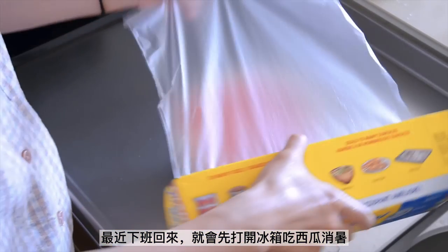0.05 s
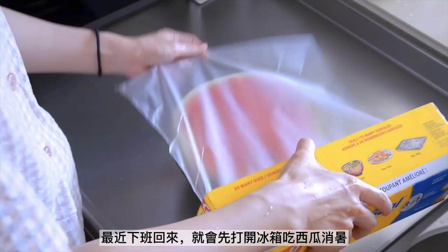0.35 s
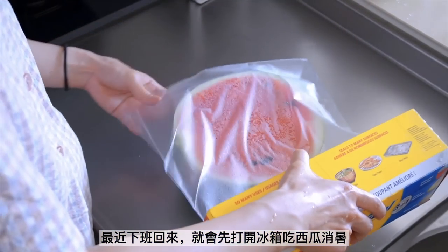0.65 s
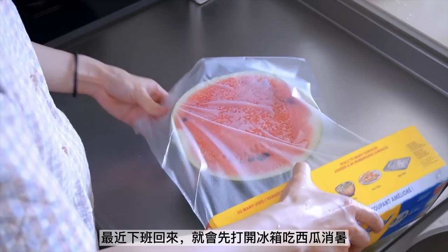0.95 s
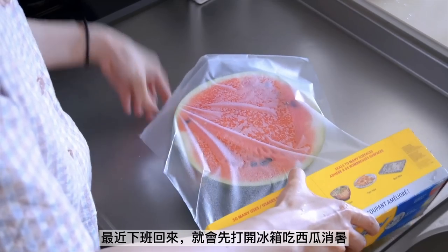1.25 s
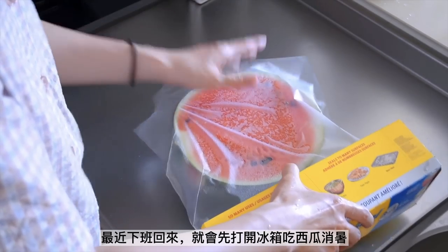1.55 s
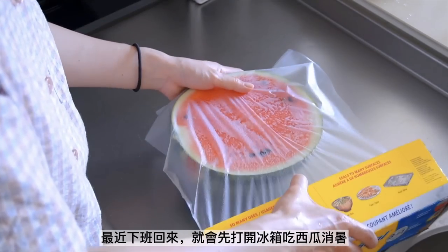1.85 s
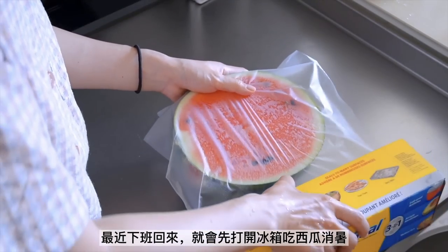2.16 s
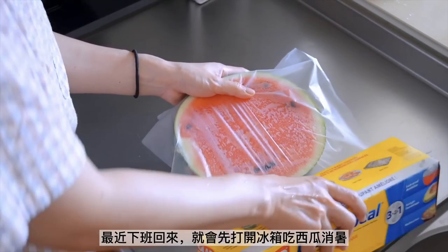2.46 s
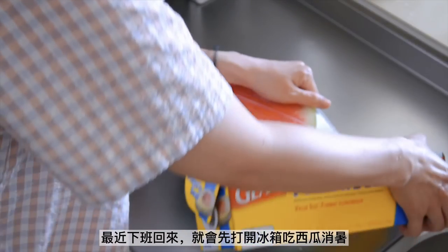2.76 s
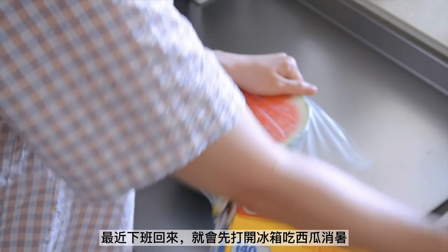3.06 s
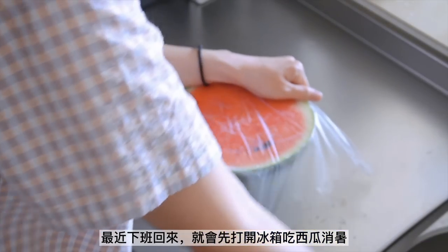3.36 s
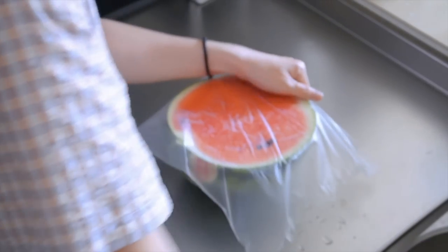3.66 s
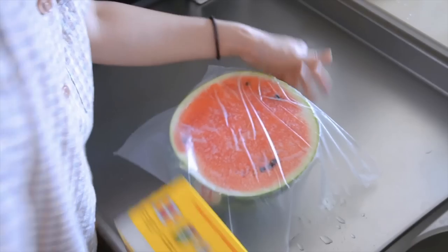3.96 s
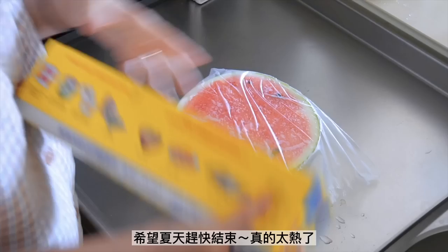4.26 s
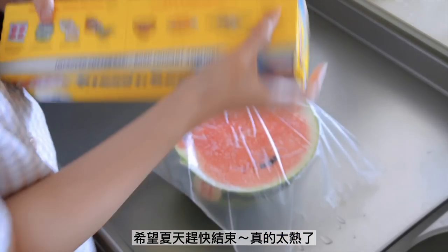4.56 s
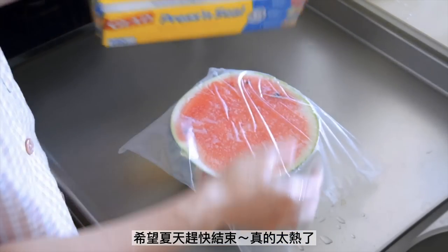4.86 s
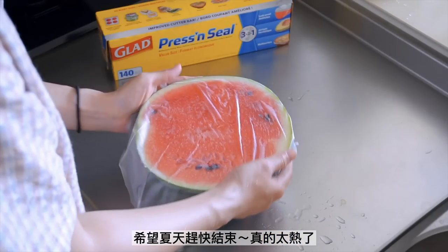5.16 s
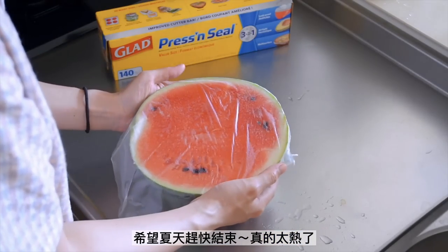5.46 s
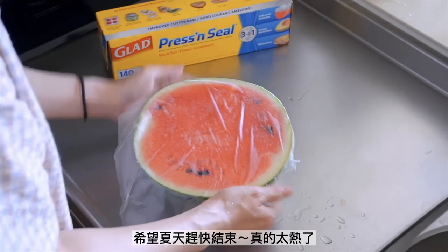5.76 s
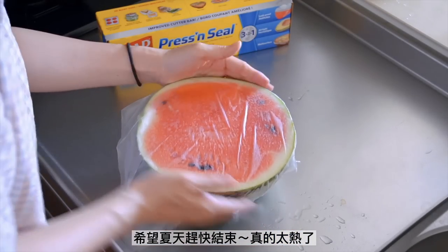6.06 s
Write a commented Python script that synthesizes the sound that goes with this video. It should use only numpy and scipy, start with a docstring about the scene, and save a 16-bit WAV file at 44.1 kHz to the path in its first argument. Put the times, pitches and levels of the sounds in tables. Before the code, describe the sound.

Plastic wrap is pulled from its cardboard box with a short rasp right at the start. It rustles softly as it is draped over half a melon until about 1.5 seconds, then crinkles as it is stretched, while the roll knocks hollowly in the box several times between 1.8 and 2.8 seconds. From 2.8 to 3.5 seconds the film tears along the toothed edge in loud, coarse bursts with sharp snaps, ending with a dull knock. A lighter rustle follows near 3.7 seconds, and the box is set down with soft scuffs around 4.5 seconds. At 5 seconds a palm pats the melon, and the wrap is pressed around it with crisp crackles, snaps and faint squeaks, easing briefly before a last burst just after 6 seconds. Everything is close and straight ahead, with a small kitchen's short echo and quiet, steady room noise.

```python
"""Plastic wrap is pulled from its cardboard box and draped over half a melon on a steel kitchen counter.
The film crinkles as swarms of tiny creases buckle; now and then a large one snaps or the film squeaks.
It is stretched, the roll knocking in the box, and at 2.8 s torn off on the toothed edge; box and taut
sheet add a hollow body. The film is let go and the box set down. At 5 s a palm pats the melon and the
wrap is pressed down round it. The small room echoes over quiet, steady noise."""
import sys
import numpy as np
from scipy import signal
from scipy.fft import rfft, irfft
from scipy.io import wavfile
from scipy.ndimage import uniform_filter1d

SR = 44100
rng = np.random.default_rng(int(sys.argv[2]) if len(sys.argv) > 2 else 0)


def put_to_file(sound):
    """Save the sound as 16-bit audio at rate SR, in the file named by the first command-line argument."""
    columns = np.atleast_2d(sound).T  # one column per channel
    safe = np.clip(columns, -1, 1)
    whole_steps = np.round(safe * 32767)
    wavfile.write(sys.argv[1], SR, whole_steps.astype(np.int16))


N = 274302
TAPS = 2048
BINS_HZ = np.fft.rfftfreq(TAPS, 1 / SR)


# Hand strokes, one table per action. Each row: start in seconds, rise in seconds, hold in seconds,
# fade in dB/s, crinkle level in dB, top treble over the crinkle in dB, hollow body level in dB.
UNROLL_STROKES = [(0.0, 0.001, .022, 230, -31.5, -7, -38.5), (0.05, 0.0092, 0.068, 150, -40, -7.5, -44.5),
                  (0.27, .01, .05, 40, -61.5, -1.5, -69)]
DRAPE_STROKES = [(0.345, .05, .1, 11, -53.5, -4, -66), (0.43, 0.068, .025, 230, -49.5, -1, -62),
                 (0.65, 0.061, 0.023, 50, -42, -1, -52.5), (0.92, .012, 0.0082, 90, -55, 2, -56.5),
                 (1.075, 0.016, .08, 20, -53, -2, -61), (1.31, .06, 0.1, 270, -54, -1.5, -75)]
STRETCH_STROKES = [(1.531, .005, .05, 40, -52.5, 0, -61.5), (1.58, 0.094, .1, 50, -47.5, 1.5, -56.5),
                   (1.71, 0.048, 0.022, 85, -46, -7, -43), (1.825, 0.011, .04, 100, -48.5, -4, -43),
                   (1.94, 0.018, 0.014, 190, -47, -4, -43), (2.1, 0.02, 0.072, 210, -56.5, -4, -51),
                   (2.245, 0.0036, 0.13, 110, -52.5, -2.5, -50), (2.475, 0.0064, .01, 75, -55, 0.5, -57),
                   (2.612, .015, .02, 65, -49, 0.5, -55.5), (2.73, .04, .02, 120, -50.5, 2, -56.5)]
TEAR_STROKES = [(2.812, 0.0084, .012, 300, -30.5, 3.5, -34), (2.85, 0.014, 0.021, 159, -30.5, 3, -32.5),
                (2.955, .004, .029, 260, -26.5, 2, -32), (3.0, .012, 0.024, 170, -32.5, 4, -34),
                (3.06, 0.0079, .012, 380, -34, 1.5, -42), (3.15, .038, .002, 300, -30.5, 1, -39.5),
                (3.21, 0.0087, 0.009, 230, -39, 2, -41.5), (3.28, 0.0092, 0.064, 100, -47, 3.5, -51.5),
                (3.351, .016, .028, 330, -26.5, 4.5, -35), (3.425, 0.011, 0.0092, 154, -36, 2, -37)]
LET_GO_STROKES = [(3.635, .035, .06, 150, -58.5, 4, -74), (3.72, .03, 0.092, 130, -45, 2, -61),
                  (3.78, 0.024, 0.071, 170, -45.5, 3.3, -60)]
PRESS_STROKES = [(4.986, 0.013, 0.011, 75, -29, -0.5, -45.5), (5.11, 0.019, 0.055, 48, -32.5, -1, -50),
                 (5.28, 0.011, 0.062, 65, -37.5, -3, -51), (5.43, 0.0086, 0.12, 190, -41, -3.5, -51),
                 (5.595, 0.028, 0.04, 80, -40.5, -0.5, -50.5), (5.66, 0.061, 0.025, 144, -38.5, 2, -49.5),
                 (5.79, 0.027, 0.15, 60, -55, -21, -50.5), (5.975, .005, .02, 169, -37.5, 1, -45.5),
                 (6.068, 0.0046, .022, 170, -30, 0, -44), (6.125, 0.047, 0.037, 100, -33.5, 0.5, -46)]
# Film spectra, one table per state. Each row: frequency in Hz, level in dB.
ROLL_SPECTRUM = [(35, -93), (60, -49), (338, -17.5), (636, -7.5), (749, -19), (822, -7), (968, -9),
                 (1090, -1), (1200, -6.5), (4120, -8.5), (16000, -20)]
SLACK_SPECTRUM = [(35, -83), (60, -56), (193, -34), (274, -26), (579, -12), (666, -15), (785, -3),
                  (1440, -8.5), (4420, -3.5), (14200, -8), (16000, -10)]
TAUT_SPECTRUM = [(35, -88), (60, -75), (222, -20.5), (274, -21), (749, -1.5), (924, -9.5), (1040, -2.5),
                 (1170, -6), (4750, -2.5), (14900, -7), (16000, -16)]
TEAR_SPECTRUM = [(35, -68), (60, -48), (294, -13), (417, -8.5), (566, -3), (666, -6), (749, -2.5),
                 (1200, -2.5), (1310, 1), (1510, -4.5), (4030, 3), (11800, -3.5), (16000, -6.5)]
PRESS_SPECTRUM = [(35, -72), (60, -40.5), (156, -39.5), (189, -17.5), (268, -34.5), (294, -21),
                  (527, -14.5), (1380, -7.5), (2190, -7), (3190, 0), (11300, -3), (14900, -1.5),
                  (16000, -20.5)]
# Cardboard box resonances. Each row: centre in Hz, width in Hz, lift in dB.
BOX_MODES = [(203, 32, 3.5), (257, 24, 2), (570, 17, 6.5), (778, 55, 7), (1020, 106, 5.5), (1400, 40, 5.5),
             (2090, 80, -0.5), (2350, 130, 1.5), (3270, 770, 3), (4280, 630, 1.5)]

def plastic_wrap():
    """The film through six actions: draping is a fine rustle, tearing is coarse and shakes the box."""
    out = np.zeros(N)
    add(out, *film(UNROLL_STROKES, ROLL_SPECTRUM, creases_per_s=4000, spread_db=2.5, clump_db=3,
                   box_share=0.58, crinkle_db=0.5, sparkle_db=-3, body_db=-0.5))
    add(out, *film(DRAPE_STROKES, SLACK_SPECTRUM, creases_per_s=7000, spread_db=2.5, clump_db=3.5,
                   box_share=0.31, crinkle_db=-0.5, sparkle_db=-1.5, body_db=-2.5))
    add(out, *film(STRETCH_STROKES, TAUT_SPECTRUM, creases_per_s=6000, spread_db=0, clump_db=2.7,
                   box_share=0.56, crinkle_db=2.5, sparkle_db=-1, body_db=-0.5))
    add(out, *film(TEAR_STROKES, TEAR_SPECTRUM, creases_per_s=3300, spread_db=2, clump_db=2.5,
                   box_share=0.98, crinkle_db=0.5, sparkle_db=-7, body_db=-2))
    add(out, *film(LET_GO_STROKES, SLACK_SPECTRUM, creases_per_s=2900, spread_db=0, clump_db=-1.5,
                   box_share=0.28, crinkle_db=-2.5, sparkle_db=-8, body_db=-0.5))
    add(out, *film(PRESS_STROKES, PRESS_SPECTRUM, creases_per_s=5000, spread_db=1.5, clump_db=-0.5,
                   box_share=0.46, crinkle_db=0, sparkle_db=-2.5, body_db=1))
    return out


def film(strokes, spectrum, creases_per_s, spread_db, clump_db, box_share,
         crinkle_db, sparkle_db, body_db):
    """One action: crinkle and sparkle over the hollow body of sheet and box. Returns start and sound."""
    start_s, rise_s, hold_s, fade_db_per_s, level_db, crisp_db, hollow_db = strokes_by_column(strokes)
    end_s = np.max(start_s + rise_s + hold_s + 45 / fade_db_per_s)  # 45 dB into the fade
    t = np.arange(start_s.min(), min(end_s, N / SR), 1 / SR)
    pull_db = hand_effort(t - start_s, rise_s, hold_s, fade_db_per_s)
    spectrum_db = curve(spectrum, BINS_HZ) + box_share * resonance_db(BOX_MODES)
    creases = buckling(len(t), spectrum_db, creases_per_s, spread_db, clump_db)
    creases *= signal.windows.tukey(len(t), 160 / len(t))
    # The heavy body lingers; the finest creases stop first.
    body_curve_db = power_sum_db(0.91 * pull_db + hollow_db) + body_db
    crinkle_curve_db = power_sum_db(pull_db + level_db) + crinkle_db
    sparkle_curve_db = power_sum_db(1.11 * pull_db + level_db + crisp_db) + sparkle_db
    body = shaped_band(creases, body_curve_db, edges_hz=[45, 1650], core_hz=[300, 1600])
    crinkle = shaped_band(creases, crinkle_curve_db, edges_hz=[2000, 7200], core_hz=[2500, 6500])
    sparkle = shaped_band(creases, sparkle_curve_db, edges_hz=[7200, 20000], core_hz=[8000, 16000])
    return t[0], body + crinkle + sparkle


def hand_effort(age_s, rise_s, hold_s, fade_db_per_s, swell_db=14, sag_db_per_s=12.5):
    """A stroke in dB: the hand gathers speed, the creases give way under its pull, the film settles."""
    onset_db = swell_db * (1 - np.clip(age_s / rise_s, 0, 1)) ** 2
    sag_db = sag_db_per_s * np.clip(age_s - rise_s, 0, hold_s)
    settle_db = fade_db_per_s * np.maximum(age_s - rise_s - hold_s, 0)
    return np.where(age_s < 0, -200, -onset_db - sag_db - settle_db)


def buckling(size, spectrum_db, creases_per_s, spread_db, clump_db, facet_db=4, turn_db=1.5, facets=20):
    """Creases buckle at random, mostly small; each facet of the sheet rings its own way, in turns."""
    neighbours_db = clump_db * drift(size, 170)  # one crease sets off the next
    out, power = np.zeros(size), np.zeros(size)
    for _ in range(facets):
        modes = [(1500 * 9 ** u, 350 + 1100 * u, facet_db * (0.5 + v)) for u, v in rng.random((3, 2))]
        crease_db = spread_db * np.minimum(rng.exponential(1, size), 4)
        crease_db += neighbours_db + turn_db * drift(size, 14.3)
        buckles = rng.random(size) < creases_per_s / facets / SR
        clicks = gain_of(crease_db) * buckles * rng.choice([-1, 1], size)
        out += signal.oaconvolve(clicks, ring(spectrum_db + resonance_db(modes)))[:size]
        power += clicks ** 2
    local_power = uniform_filter1d(uniform_filter1d(power, size=700), size=500)
    return out / np.sqrt(abs(local_power) + 0.02 * power.mean())  # the hand feeds in energy steadily


# Large creases. Each row: start in seconds, level in dB, resonance in Hz.
CREASE_SNAPS = [(0.058, -22.5, 4090), (0.121, -29, 3240), (0.1446, -29, 2720), (0.82, -25.5, 7990),
                (1.534, -34, 8790), (2.827, -15, 3680), (3.033, -14.5, 3750), (3.2835, -30, 3030),
                (3.3535, -16, 5300), (3.3907, -14.5, 3150), (5.136, -19, 4900), (5.2923, -14.5, 5100),
                (5.3778, -15, 3260), (5.4389, -14.5, 3180), (5.511, -19.5, 5070), (5.538, -19.5, 5300),
                (5.618, -25, 8250), (6.1557, -17, 3740)]

def crease_snaps(gain_db=1, width_hz=2300, lift_db=10):
    """A large crease flips: a short click that stirs the film around it."""
    out = np.zeros(N)
    for start_s, level_db, hz in CREASE_SNAPS:
        sheet = ring(curve(PRESS_SPECTRUM, BINS_HZ) + resonance_db([(hz, width_hz, lift_db)]))
        click = signal.fftconvolve(impact(chatter=0.067, decay_s=0.0028), sheet)
        add(out, start_s, at_peak(click, level_db + gain_db))
    return out


# Film sliding on fingers and rind. Each row: start in seconds, length in seconds, level in dB,
# first pitch in Hz, last pitch in Hz, jitter as a fraction of pitch.
FILM_SQUEAKS = [(1.188, 0.028, -46, 1230, 1203, 0.07), (1.238, 0.0164, -52.5, 1230, 1200, 0.08),
                (2.748, 0.053, -47.5, 4000, 4100, 0.16), (3.743, 0.016, -45.5, 2150, 2150, 0.12),
                (5.657, 0.047, -44, 5400, 5400, 0), (5.673, 0.14, -41.5, 2970, 2256, 0.25),
                (6.072, .032, -34, 3600, 3600, 0.05)]

def film_squeaks(db_per_harmonic=-4, flutter_db=6.4):
    """Stick and slip: an uneven, nearly pitched chatter with weak overtones."""
    out = np.zeros(N)
    for start_s, length_s, level_db, first_hz, last_hz, jitter in FILM_SQUEAKS:
        size = round(length_s * SR)
        pitch_hz = np.linspace(first_hz, last_hz, size) * (1 + jitter * drift(size, 1200))
        phase = 2 * np.pi * np.cumsum(pitch_hz) / SR
        tone = sum(gain_of(db_per_harmonic * k) * np.cos((k + 1) * phase) for k in range(3))
        slips = filtered(tone * gain_of(flutter_db * drift(size, 720)), [700, 6000], "band")
        add(out, start_s, gain_of(level_db) * unit_rms(slips) * signal.windows.tukey(size, 0.5))
    return out


# Knocks of the roll. Each row: start in seconds, level in dB, treble tilt in dB/octave.
ROLL_KNOCKS = [(0.927, -33.5, 1), (1.83, -28, -4), (1.863, -26.5, 3), (2.111, -36, -3), (2.168, -33, 2.5),
               (2.246, -44, 5), (2.262, -38, -11), (2.348, -26.5, 0), (2.48, -28.5, 5.5),
               (2.613, -22.5, 0.5), (2.814, -21.5, 5.5), (3.486, -25.5, -9.5)]
# Struck cardboard. Each row: frequency in Hz, level in dB.
KNOCK_SPECTRUM = [(100, -47.5), (400, -12.5), (750, 2.5), (1700, -0.5), (3500, -2.5), (7000, -3.5),
                  (16000, -14.5)]

def roll_knocks(gain_db=1):
    """The roll knocks in its box and rings the cardboard."""
    out = np.zeros(N)
    for start_s, level_db, tilt_db_per_octave in ROLL_KNOCKS:
        treble_db = tilt_db_per_octave * np.log2(1 + BINS_HZ / 3000)
        cardboard = ring(curve(KNOCK_SPECTRUM, BINS_HZ) + resonance_db(BOX_MODES) + treble_db)
        knock = signal.fftconvolve(impact(chatter=0.31, decay_s=0.0057), cardboard)
        add(out, start_s, at_peak(knock, level_db + gain_db))
    return out


# Palm on melon. Each row: frequency in Hz, level in dB.
PAT_SPECTRUM = [(40, -30), (120, -19), (200, -3), (350, -1), (620, 7), (1200, -7), (4000, -31),
                (16000, -45)]

def melon_pat(start_s=4.988, level_db=-29):
    """A palm lands; the soft fruit damps the blow within a few cycles."""
    out = np.zeros(N)
    add(out, start_s, at_peak(ring(curve(PAT_SPECTRUM, BINS_HZ)), level_db))
    return out


# Soft contacts of the box. Each row: start in seconds, level in dB, rise in seconds,
# decay in seconds, high-pass in Hz, low-pass in Hz.
BOX_BUMPS = [(3.493, -42.5, 0.007, 0.029, 230, 750), (4.404, -43.5, 0.01, 0.046, 504, 2000),
             (4.525, -50, 0.018, 0.068, 450, 4500), (4.556, -44, 0.002, 0.019, 367, 450)]

def box_bumps(box_share=0.2):
    """The box is swung clear and set down: dull scuffs that swell and die."""
    out, t = np.zeros(N), np.arange(SR // 3) / SR
    cardboard = ring(box_share * resonance_db(BOX_MODES))
    for start_s, level_db, rise_s, decay_s, highpass_hz, lowpass_hz in BOX_BUMPS:
        body = filtered(cardboard, highpass_hz, "high", order=4)
        body = filtered(body, lowpass_hz, "low", order=1)
        envelope = np.minimum(t / rise_s, 1) * np.exp(-np.maximum(t - rise_s, 0) / decay_s)
        scuff = rng.standard_normal(len(t)) * envelope
        add(out, start_s, gain_of(level_db) * signal.fftconvolve(scuff, unit_energy(body)))
    return out


# Room decay. Each row: frequency in Hz, T60 in seconds.
KITCHEN_T60 = [(200, 0.18), (1000, 0.52), (4000, 0.41), (9000, 0.44), (16000, 0.39)]

def echo_paths(early_db=-2, early_decay_s=0.012, tail_db=-6, tail_rise_s=0.0091):
    """Stereo response: quick glances off the steel counter and wall, then the small room's tail."""
    t = np.arange(SR // 2) / SR
    shape = (2, 2, len(t))
    early, tail = rng.choice([-1., 1.], shape) * (rng.random(shape) < 4000 / SR)
    early = early * np.exp(-t / early_decay_s) * (t > 0.0004)
    early = filtered(early, 2600, "high", order=1)  # short waves scatter most
    hz, frame_s, frames = signal.stft(tail * np.minimum(t / tail_rise_s, 1), SR, nperseg=256)
    decay = gain_of(-60 * frame_s / curve(KITCHEN_T60, hz)[:, None])
    tail = signal.istft(frames * decay, SR, nperseg=256)[1][:, :len(t)]
    return gain_of(early_db) * unit_energy(early) + gain_of(tail_db) * unit_energy(tail)


def kitchen(direct, gain_db=-1.92, spots=6):
    """The sounding spot jumps about the sheet, so the pattern of echoes keeps changing."""
    shares = np.array([drift(N, 45) for _ in range(spots)])
    shares /= np.linalg.norm(shares, axis=0)
    wet = sum(signal.oaconvolve((direct * share)[None], echo_paths(), axes=1)[:, :N] for share in shares)
    return gain_of(gain_db) * (direct + wet)


# Room noise. Each row: frequency in Hz, level in dB.
ROOM_SPECTRUM = [(24, -92.5), (40, -62), (115, -28), (163, -29.5), (189, -16), (402, -13), (516, -4),
                 (630, -6.5), (680, -1.5), (942, -4), (1070, -0.5), (1810, -1.5), (2570, -5),
                 (16000, -36.5)]
# Its stereo width. Each row: frequency in Hz, side gain in dB.
ROOM_WIDTH = [(100, -7), (1000, -21.5), (2200, -24.5), (3500, -10.5), (6000, -5), (16000, 2)]

def room_noise(level_db=-59.5, waver_db=1.7):
    """Quiet room noise from all sides, wavering slightly."""
    noise = narrowed(equalised(rng.standard_normal((2, N)), ROOM_SPECTRUM), ROOM_WIDTH)
    return gain_of(level_db + waver_db * drift(N, 25.03)) * unit_rms(noise)


def impact(chatter, decay_s):
    """One sharp impulse and the dying chatter it shakes loose."""
    force = chatter * rng.standard_normal(TAPS) * np.exp(-np.arange(TAPS) / SR / decay_s)
    force[0] = 1
    return force


def ring(spectrum_db):
    """Minimum-phase impulse response of a body with this spectrum, at unit energy."""
    cepstrum = irfft(np.log(gain_of(np.maximum(spectrum_db, spectrum_db.max() - 90))))
    cepstrum[1:TAPS // 2] *= 2
    cepstrum[TAPS // 2 + 1:] = 0
    return unit_energy(irfft(np.exp(rfft(cepstrum))))


def resonance_db(modes):
    """The bumps that resonances put on a spectrum."""
    return sum(db / (1 + (2 * (BINS_HZ - hz) / width_hz) ** 2) for hz, width_hz, db in modes)


def shaped_band(x, curve_db, edges_hz, core_hz):
    """One band of x, scaled so that its core follows a level curve."""
    core = filtered(filtered(x, edges_hz, "band"), core_hz, "band", order=6)
    return filtered(x * gain_of(curve_db), edges_hz, "band") / np.std(core)


def narrowed(pair, width):
    """Two close microphones hear nearly the same bass and differ most in the treble."""
    mid = pair.mean(0)
    side = equalised(pair[0] - mid, width)
    return np.array([mid + side, mid - side])


def drift(size, knots_per_s):
    """Smooth random curve of about unit size."""
    return np.interp(np.arange(size) * knots_per_s / SR, np.arange(4000), rng.standard_normal(4000))


def curve(points, hz):
    """Interpolates (Hz, value) rows on a log-frequency axis."""
    knots_hz, values = np.transpose(points)
    return np.interp(np.log(hz + 1), np.log(knots_hz + 1), values)


def equalised(x, spectrum):
    return irfft(rfft(x) * gain_of(curve(spectrum, np.fft.rfftfreq(N, 1 / SR))), N)


def filtered(x, hz, kind, order=3):
    return signal.sosfilt(signal.butter(order, hz, kind, fs=SR, output="sos"), x)


def strokes_by_column(strokes):
    return np.transpose(strokes)[:, :, None]


def add(mix, start_s, sound):
    part = mix[round(start_s * SR):][:len(sound)]
    part += sound[:len(part)]


def gain_of(db):
    return 10 ** (np.asarray(db) / 20)


def power_sum_db(levels_db):
    return 10 * np.log10(np.sum(gain_of(levels_db) ** 2, axis=0) + 1e-20)


def at_peak(x, db):
    return gain_of(db) * x / abs(x).max()


def unit_rms(x):
    return x / np.sqrt(np.mean(x ** 2) + 1e-20)


def unit_energy(x):
    return x / np.linalg.norm(x, axis=-1, keepdims=True)


# Stereo width of the handling. Each row: frequency in Hz, side gain in dB.
HANDLING_WIDTH = [(100, -17.5), (700, -6.5), (1500, -52), (3300, -29), (4500, -29), (6000, -4), (9000, -1),
                  (16000, -0.5)]

def scene():
    """All the handling happens straight ahead, over the room noise."""
    handling = plastic_wrap() + crease_snaps() + film_squeaks()
    handling += roll_knocks() + box_bumps() + melon_pat()
    return narrowed(kitchen(handling), HANDLING_WIDTH) + room_noise()


def record(dry):
    """Steep low-pass at 16050 Hz."""
    lowpass = signal.firwin(511, 16050, window=("kaiser", 9), fs=SR)
    return signal.oaconvolve(dry, lowpass[None], "same")


dry = scene()
out = record(dry)
put_to_file(out)
```